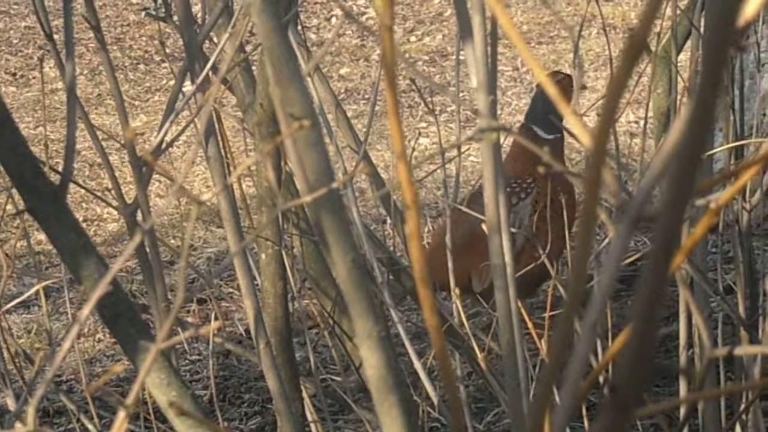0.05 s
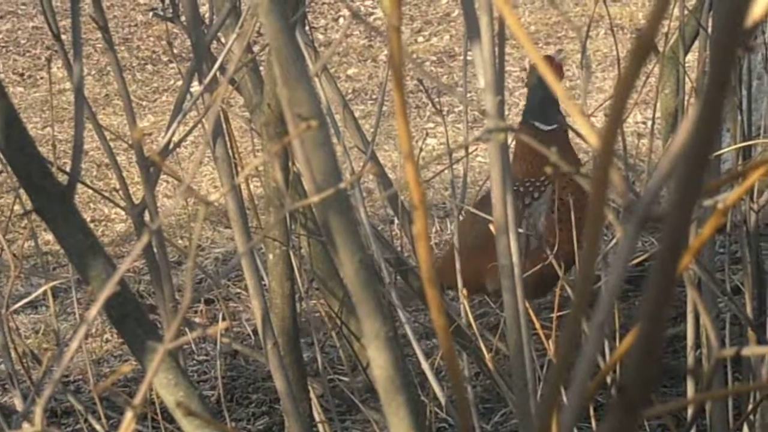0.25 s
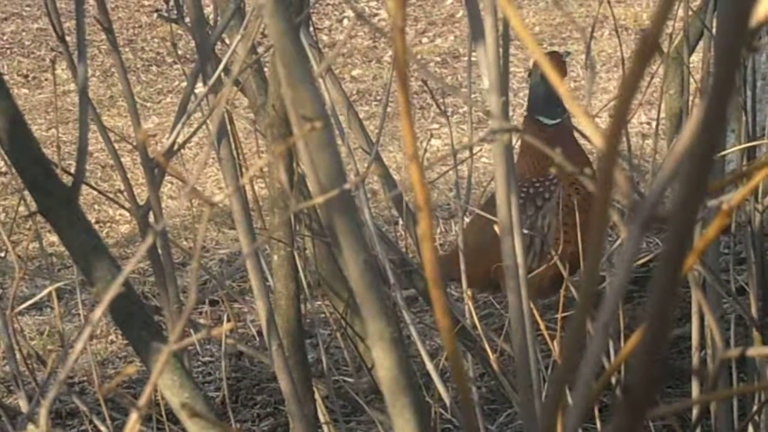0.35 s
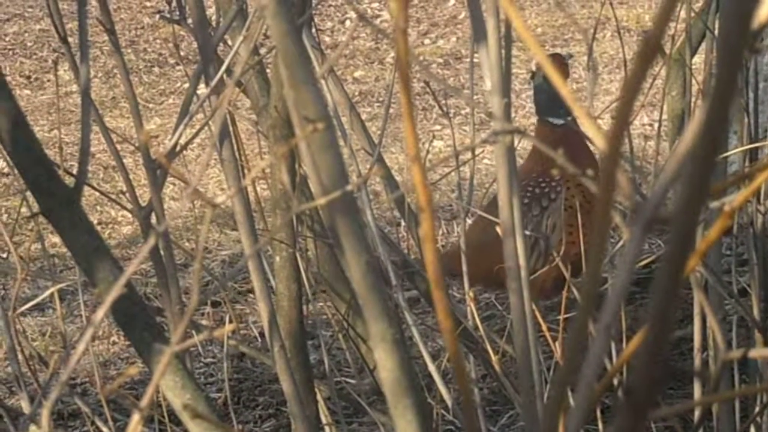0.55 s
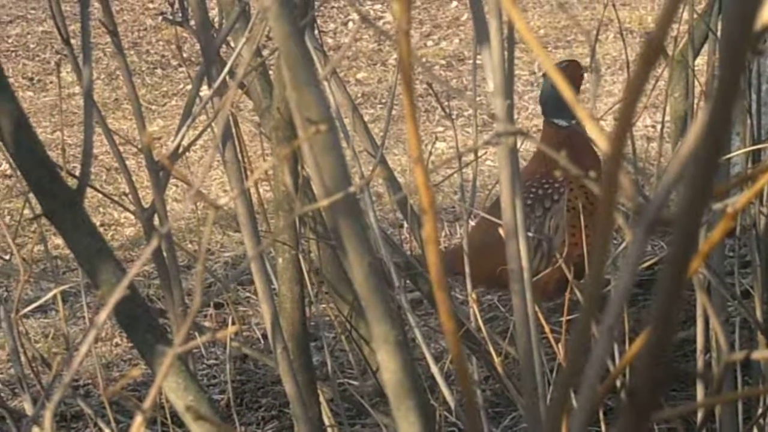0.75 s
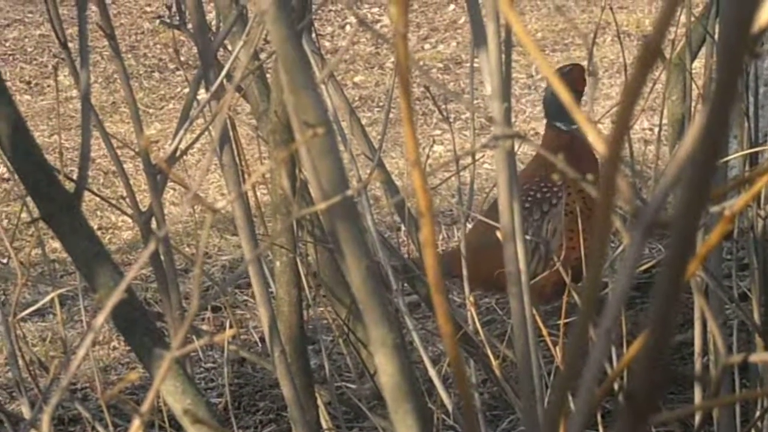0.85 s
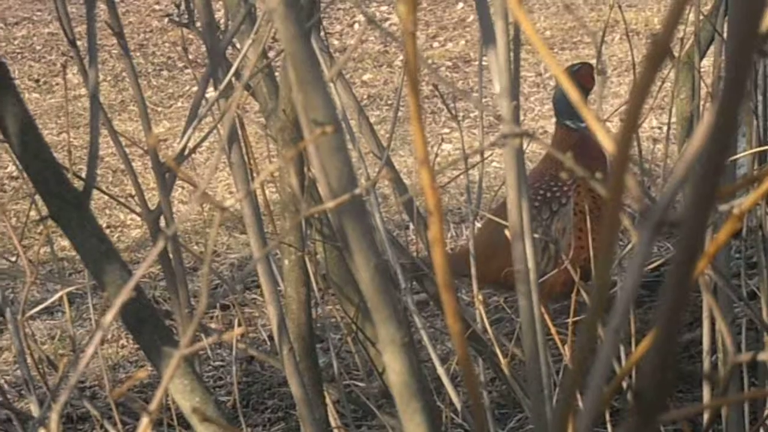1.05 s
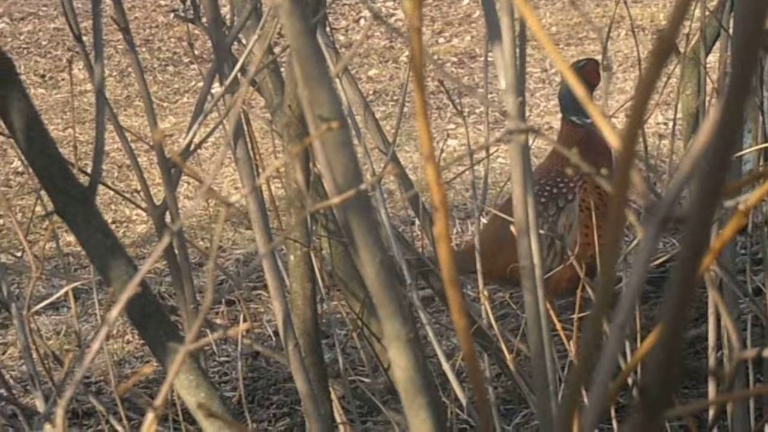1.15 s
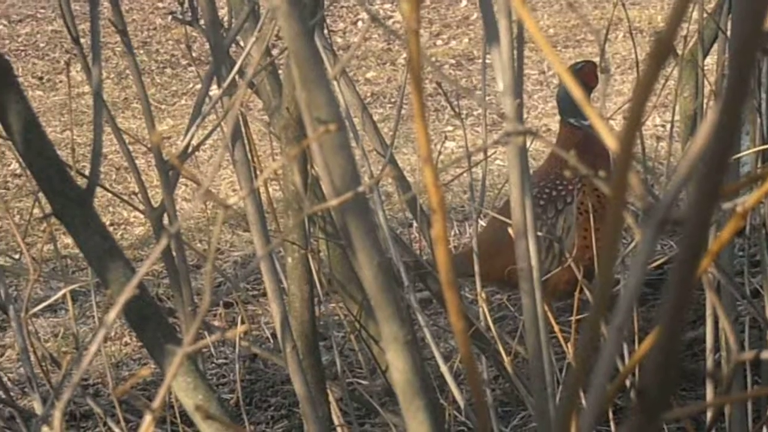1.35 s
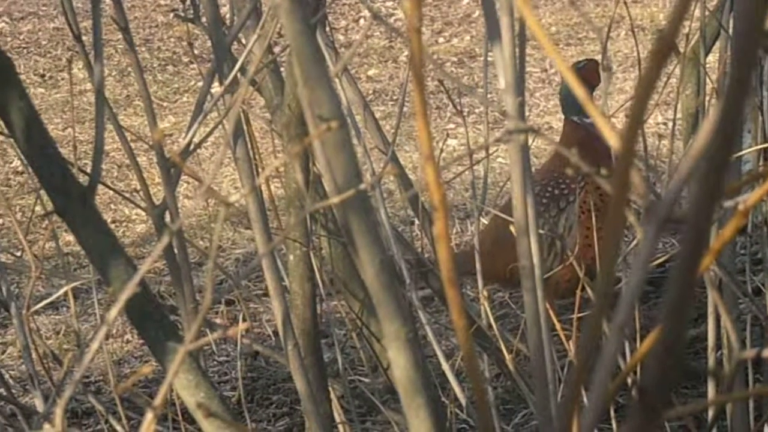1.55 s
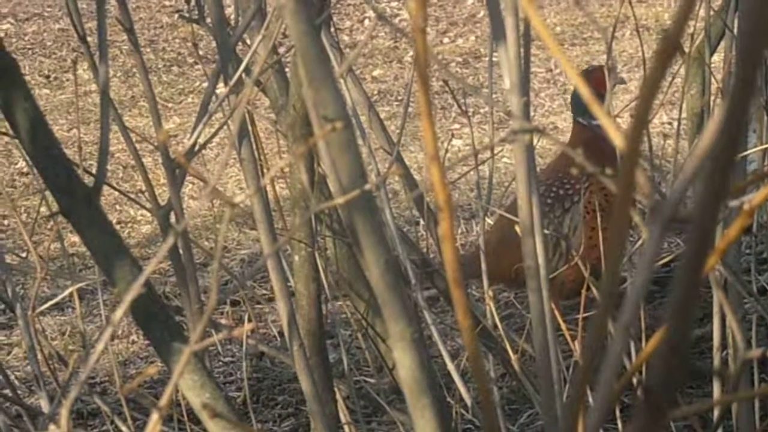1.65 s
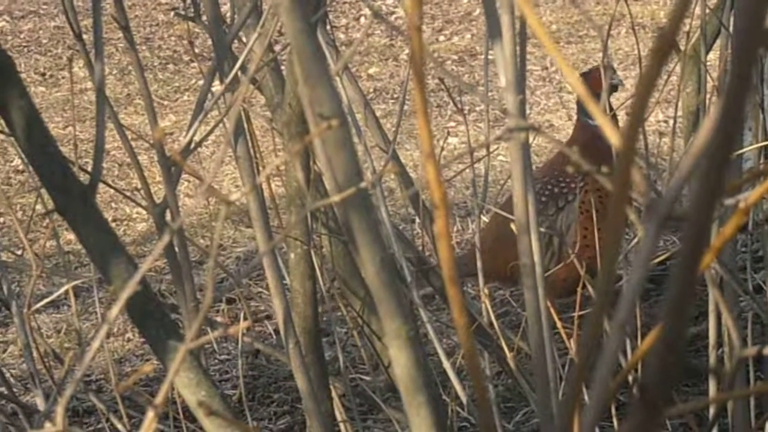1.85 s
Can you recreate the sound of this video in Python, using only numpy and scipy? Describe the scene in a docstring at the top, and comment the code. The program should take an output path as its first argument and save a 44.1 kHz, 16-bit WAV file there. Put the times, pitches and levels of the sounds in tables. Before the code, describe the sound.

One close, rasping two-syllable pheasant crow rings through woodland, followed by faint birdsong.

```python
"""Bare woodland, one microphone: a distant rumble and the recorder's thin whine run throughout. A quarter
second in, a cock pheasant crows once, close by: two harsh syllables, rasping through throat and beak, that
overload the microphone and ring on among the trees. A larger bird gives a low call far off. Then small birds
answer faintly: a run of falling chirps from the thicket, a thin whistle that rings a little more among the
trees and, last, a nasal note."""
import sys
import numpy as np
from scipy import signal
from scipy.fft import rfft, irfft
from scipy.io import wavfile

SR = 44100
rng = np.random.default_rng(int(sys.argv[2]) if len(sys.argv) > 2 else 0)


def bounce(signal):
    """Save signal as a 16-bit WAV file at the path given by the first command-line argument."""
    frames = np.transpose(np.atleast_2d(signal))
    limited = np.clip(frames, -1, 1)
    pcm = np.round(limited * 32767).astype(np.int16)
    wavfile.write(sys.argv[1], SR, pcm)


N = 83790
T = np.arange(N) / SR

# Distant rumble and hiss. Each row: frequency in Hz, relative level per Hz in dB.
AIR_SPECTRUM = [(15, -7), (27, 0), (45, -15.5), (80, -15), (170, -22.5), (290, -17.5), (450, -26.5),
                (700, -28), (1050, -33.5), (1500, -41), (2500, -42), (5000, -44.5), (10000, -46),
                (15500, -46.5)]
# The recorder's own whine. Each row: frequency in Hz, level between dips in dB.
WHINE_TONES = [(7865, -48.5), (5920, -66.5), (9800, -69)]
# The close crow, one arch to a syllable. Each row: time in seconds, pitch in Hz.
CROW_PITCH = [(.234, 1040), (.245, 1064), (.262, 1054), (.276, 985), (.289, 885), (.298, 865), (.308, 965),
              (.323, 1048), (.338, 1066), (.357, 1056), (.371, 955), (.386, 800)]
# Its force. Each row: time in seconds, fundamental level in dB, gain of overtones and rasp in dB.
CROW_FORCE = [(.2325, -69, -47), (.235, -35, -17.5), (.238, -24, -9), (.241, -7.5, -4.5),
              (.250, -3.5, -2.5), (.268, -7, -3), (.279, -15.5, -12.5), (.297, -17, -15.5), (.311, -14, -8),
              (.322, -9, -3), (.336, -5, -1), (.354, -8.5, -4.5), (.366, -9.5, -9), (.375, -17.5, -9),
              (.380, -15, -21), (.388, -22, -21)]
# Its overtones. Each row: multiple of the pitch, relative level in dB, phase wobble in radians.
CROW_OVERTONES = [(2, -23.5, .3), (3, -28.5, 0.61), (4, -14, .25), (5, -13, 0.89), (6, -18.5, 1.0),
                  (7, -18.5, 0.68), (8, -37, 0.13), (9, -28, 1)]
# Resonances of throat and beak. Each row: centre in Hz, width in Hz, relative level in dB.
THROAT_RESONANCES = [(861, 460, 2), (1826, 310, -7.5), (3395, 680, -5.5), (3730, 770, 3.5), (4300, 174, -4),
                     (4840, 280, 7), (5286, 350, -1), (6010, 760, -1), (6970, 380, 4), (8530, 1400, -5),
                     (8750, 280, -11.5)]
# The squeak that opens the crow. Each row: time in seconds, pitch in Hz, level in dB.
OPENING_SQUEAK = [(.233, 3845, -31.5), (.235, 3677, -18.5), (.241, 3870, -7), (.247, 4150, -22)]
# Narrow resonances that sing out as overtones sweep across them.
# Each row: centre in Hz, width in Hz, gain toward the microphone in dB, gain into the trees in dB.
CROW_RINGS = [(1790, 180, -13, 2.5), (3197, 21, -7, 10), (4290, 32.4, 4, 15), (5300, 210, 0.5, 3.5),
              (5672, 210, 1.5, -11), (7183, 170, -14, -15), (8200, 30, -3, -4.5)]
# Echo of the trunks all around. Each row: frequency in Hz, gain in dB, seconds to fall by 60 dB.
TRUNK_ECHO = [(300, -4, 1), (1080, -19.5, 0.82), (1980, -13.5, 0.52), (3970, -15, 0.57), (6800, -18, 0.55),
              (10000, -16, 0.61), (16000, -33, .3)]
# Echoes from far stands of trees. Each row: delay in seconds, gain in dB.
FAR_ECHOES = [(.13, -25.5), (.30, -41.5), (.91, -47), (1.029, -51)]
# A larger bird, far off. Each row: time in seconds, pitch in Hz, fundamental level in dB.
FAR_CALL = [(.78, 475, -55), (.80, 564.5, -45.5), (.825, 593, -50), (.85, 475, -51), (.87, 440, -61.5)]
# Chirps in the thicket. Each row: start in seconds, starting pitch in Hz, level in dB.
CHIRPS = [(.904, 3670, -50.5), (0.963, 4160, -48), (1.021, 4190, -45), (1.084, 4210, -46),
          (1.144, 4240, -47.5), (1.207, 4120, -48.5), (1.28, 4090, -47.5)]
# A thin whistle, ringing a little more among the trees. Each row: time in seconds, pitch in Hz, level in dB.
WHISTLE = [(1.593, 2620, -59), (1.599, 5100, -43), (1.605, 6360, -39.5), (1.616, 7066, -42.5),
           (1.66, 7065, -48), (1.70, 7020, -45), (1.728, 6870, -63), (1.748, 7090, -44), (1.77, 7020, -71),
           (1.845, 7000, -54), (1.86, 6760, -73.5)]
# A nasal note in the thicket. Each row: time in seconds, pitch in Hz, level in dB.
NASAL_NOTE = [(1.852, 350, -59), (1.863, 422, -44), (1.882, 455, -45), (1.90, 407, -47)]
# The colour of its harmonics. Each row: frequency in Hz, relative level in dB.
NASAL_COLOUR = [(1200, -29), (2000, -2.5), (2700, -20), (3400, 1.5), (4400, -3.5), (4800, -6.5), (5400, -1),
                (6500, -15)]

JITTER_HZ = 307   # how fast the birds' voices tremble


def from_db(db):
    """Decibels to gain."""
    return 10 ** (np.asarray(db) / 20)


def rms_one(x):
    """Scale to unit power."""
    return x / np.sqrt(np.mean(x ** 2) + 1e-20)


def in_time(rows):
    """Each column of a curve at every sample."""
    times, *columns = np.transpose(rows)
    return [np.interp(T, times, column) for column in columns]


def during(rows):
    """One between a curve's first and last points, else zero."""
    return (T >= rows[0][0]) & (T <= rows[-1][0])


def at_hz(rows, hz, column=1):
    """Read a column of a table on a log-frequency scale."""
    table = np.array(rows)
    return np.interp(np.log(hz + 1e-9), np.log(table[:, 0]), table[:, column])


def low_pass(x, hz, order=2):
    """Butterworth low-pass."""
    return signal.sosfilt(signal.butter(order, hz, fs=SR, output="sos"), x)


def drift(hz):
    """Smooth random wander of unit power."""
    return rms_one(low_pass(rng.standard_normal(N), hz))


def phase_of(hz):
    """Running phase of a pitch curve."""
    return 2 * np.pi * np.cumsum(hz) / SR


def tone(phase):
    """A sine of unit power with a random starting phase."""
    return np.sqrt(2) * np.sin(phase + rng.uniform(0, 2 * np.pi))


def resonate(x, hz, width_hz):
    """A resonance with gain 1 at its peak."""
    r = np.exp(-np.pi * width_hz / SR)
    poles = [1, -2 * r * np.cos(2 * np.pi * hz / SR), r * r]
    return signal.lfilter(np.array([1, 0, -1]) * (1 - r * r) / 2, poles, x)


def smear(x, decay_s):
    """Pass a sound through a dying cloud of reflections of unit energy."""
    cloud = rng.standard_normal(N) * np.exp(-T / decay_s)
    return signal.fftconvolve(x, rms_one(cloud) / np.sqrt(N))[:N]


def air(level_db=-38.5):
    """The bed of the place: distant rumble and soft hiss."""
    colour = from_db(at_hz(AIR_SPECTRUM, np.fft.rfftfreq(N, 1 / SR)))
    return from_db(level_db) * rms_one(irfft(rfft(rng.standard_normal(N)) * colour, N))


def recorder_whine(pulse_hz=30.03, peak_s=.022, dip_db=-6.5):
    """The recorder's electronics whine, switching between two levels."""
    dipped = np.cos(2 * np.pi * pulse_hz * (T - peak_s)) < 0
    steady = sum(from_db(db) * tone(2 * np.pi * hz * T) for hz, db in WHINE_TONES)
    return from_db(dip_db * dipped) * steady


def throat_rasp(phase, puff_depth=.58, top_hz=9600):
    """Noise puffed through throat and beak on every cycle of the crow."""
    puffs = rng.standard_normal((len(THROAT_RESONANCES), N)) * (1 + puff_depth * np.cos(phase))
    rasp = sum(from_db(db) * resonate(resonate(puff, hz, width), hz, 2 * width)
               for puff, (hz, width, db) in zip(puffs, THROAT_RESONANCES))
    return rms_one(low_pass(rasp, top_hz, order=6))


def pheasant(jitter=.011, shimmer_db=.98, overtone_shimmer_db=1, shimmer_hz=140, rasp_db=-5):
    """A strong fundamental, rough overtones and rasp, sent to the microphone and out into the trees."""
    pitch, = in_time(CROW_PITCH)
    fundamental_db, upper_db = in_time(CROW_FORCE)
    phase = phase_of(pitch * (1 + jitter * drift(JITTER_HZ)))
    fundamental = tone(phase) * from_db(fundamental_db + shimmer_db * drift(shimmer_hz))
    overtones = 0
    for multiple, db, wobble in CROW_OVERTONES:
        overtone = tone(multiple * phase + wobble * drift(JITTER_HZ))
        shimmer = from_db(overtone_shimmer_db * drift(shimmer_hz))
        overtones += from_db(db) * rms_one(overtone * shimmer)
    rasp = from_db(rasp_db) * throat_rasp(phase)
    upper = during(CROW_FORCE) * from_db(upper_db) * (overtones + rasp) + 1e-18
    direct = outward = during(CROW_FORCE) * fundamental + upper + whistled_note(OPENING_SQUEAK)
    for hz, width, direct_db, outward_db in CROW_RINGS:
        ring = resonate(upper, hz, width)
        direct = direct + from_db(direct_db) * ring
        outward = outward + from_db(outward_db) * ring
    return direct, outward


def whistled_note(rows):
    """A bird's squeak or whistle: one sine gliding in pitch and level."""
    hz, db = in_time(rows)
    return during(rows) * from_db(db) * tone(phase_of(hz))


def trunk_echo(x, build_s=.0027):
    """Diffuse echo of the trunks around the microphone; the treble dies first."""
    edges = np.geomspace(150, 18000, 14)
    white = rfft(rng.standard_normal(N))
    hz = np.fft.rfftfreq(N, 1 / SR)
    tail = 0
    for low, high in zip(edges, edges[1:]):
        centre = np.sqrt(low * high)
        band = irfft(white * (hz >= low) * (hz < high), N)
        fall = from_db(-60 * T / at_hz(TRUNK_ECHO, centre, column=2))
        envelope = rms_one(fall * (1 - np.exp(-T / build_s))) / np.sqrt(N)
        tail += from_db(at_hz(TRUNK_ECHO, centre)) * envelope * band
    return signal.fftconvolve(x, tail)[:N]


def far_echoes(x):
    """Far stands of trees return the crow dull and blurred."""
    dull = low_pass(x, hz=2520)
    return sum(from_db(db) * np.interp(T - delay, T, smear(dull, decay_s=.04), left=0)
               for delay, db in FAR_ECHOES)


def far_call(jitter=.015, octave_db=-6.5):
    """A larger bird a long way off: a faint low arch with its octave."""
    hz, db = in_time(FAR_CALL)
    phase = phase_of(hz * (1 + jitter * drift(JITTER_HZ)))
    return during(FAR_CALL) * from_db(db) * (tone(phase) + from_db(octave_db) * tone(2 * phase))


def chirps(length_s=.024, fall_hz=1760, bend=2.01):
    """From the thicket, each chirp swells and fades while its pitch falls ever faster."""
    run = np.zeros(N)
    for start, hz, db in CHIRPS:
        progress = np.clip((T - start) / length_s, 0, 1)
        pitch = hz - fall_hz * progress ** bend
        run += from_db(db) * np.sin(np.pi * progress) * tone(phase_of(pitch))
    return run


def nasal_note(jitter=.0048):
    """A short buzzy arch from the thicket, strong in its upper harmonics."""
    hz, db = in_time(NASAL_NOTE)
    phase = phase_of(hz * (1 + jitter * drift(JITTER_HZ)))
    buzz = sum(from_db(at_hz(NASAL_COLOUR, k * hz)) * tone(k * phase) for k in range(1, 16))
    return during(NASAL_NOTE) * from_db(db) * rms_one(buzz)


def scene():
    """What reaches the microphone: the pheasant close by, the other birds deeper among the trees."""
    crow, outward = pheasant()
    hidden_birds = chirps() + nasal_note() + far_call()
    whistle = whistled_note(WHISTLE)
    answers = hidden_birds + from_db(1.5) * whistle   # as sent into the stems and trunks
    near_scatter = from_db(-7) * smear(crow, decay_s=.0046)   # off nearby stems and ground
    thicket_scatter = from_db(-5) * smear(answers, decay_s=.03)
    echoes = trunk_echo(outward + from_db(5) * answers) + far_echoes(outward)
    return (crow + hidden_birds + whistle + near_scatter + thicket_scatter + echoes + air())[None]


def record(dry, ceiling=.72, knee=4.0, cutoff_hz=15900):
    """The recorder adds its whine, flattens the loud peaks and cuts the top."""
    x = dry + recorder_whine()
    overloaded = x / (1 + np.abs(x / ceiling) ** knee) ** (1 / knee)
    top_cut = signal.firwin(301, cutoff_hz, fs=SR)
    return signal.fftconvolve(overloaded, top_cut[None], mode="same")


dry = scene()
out = record(dry)
bounce(out)
```